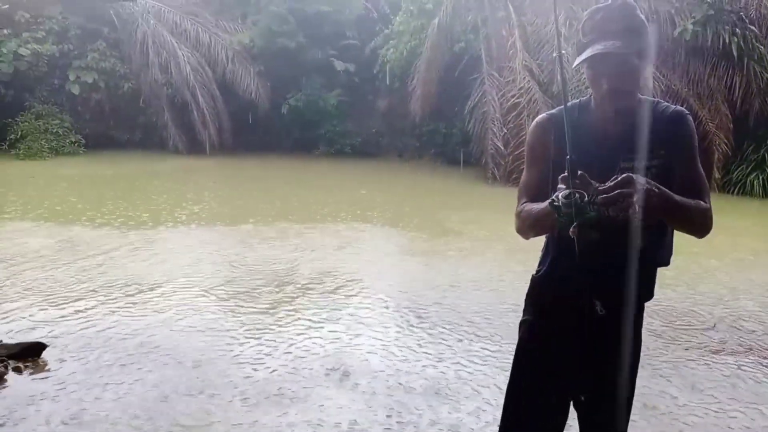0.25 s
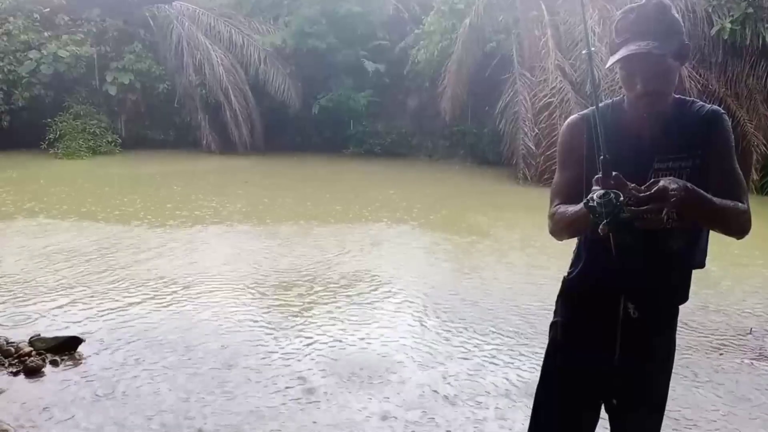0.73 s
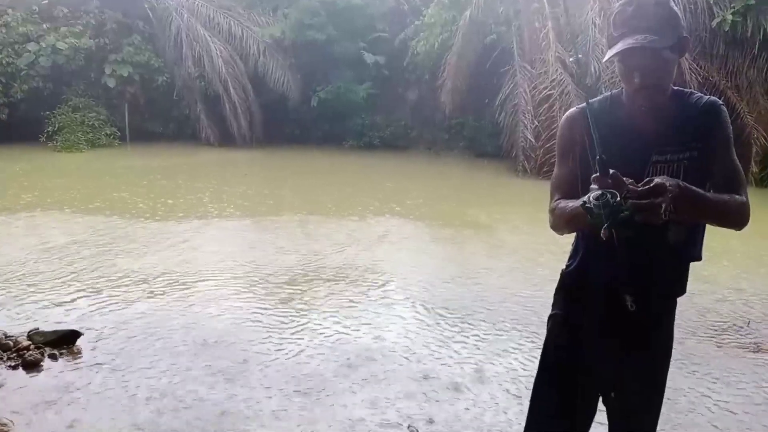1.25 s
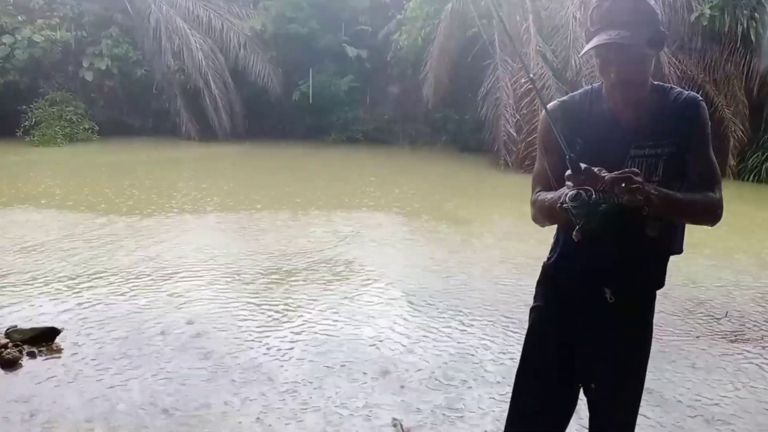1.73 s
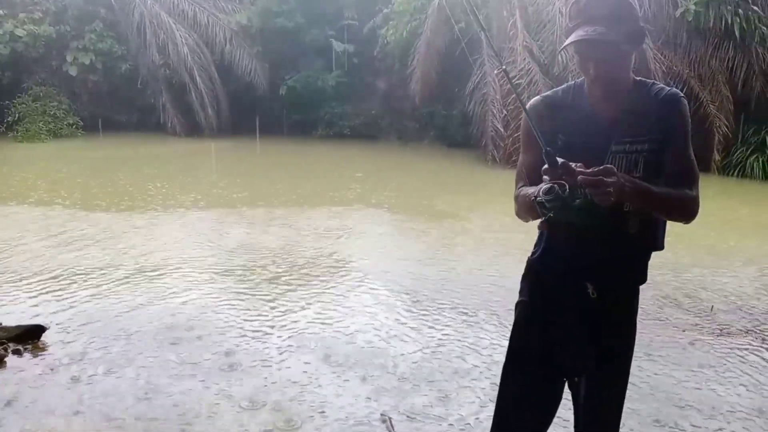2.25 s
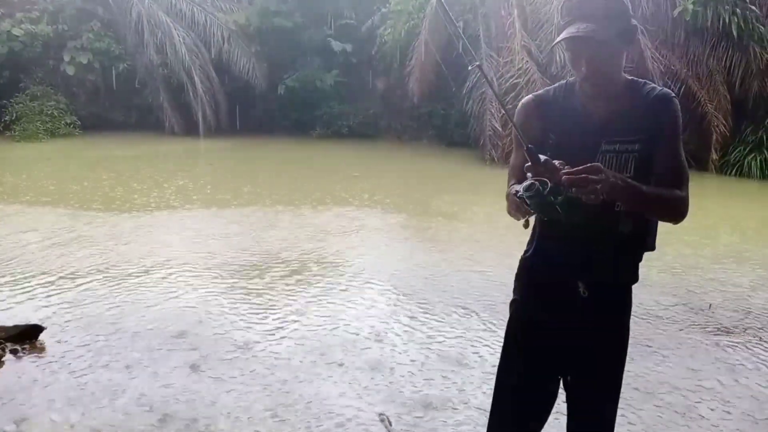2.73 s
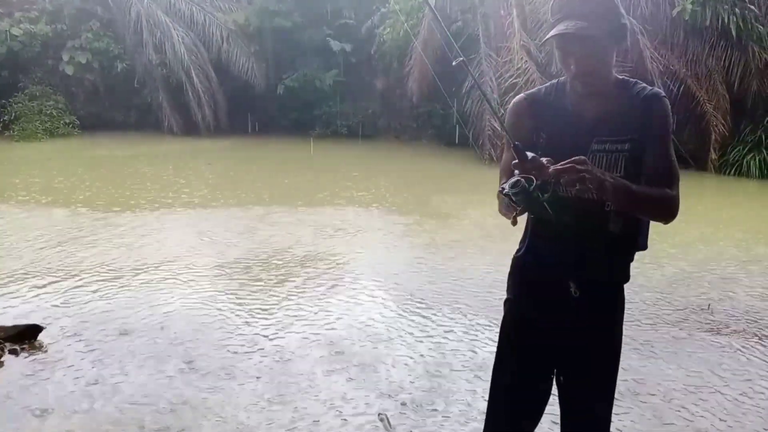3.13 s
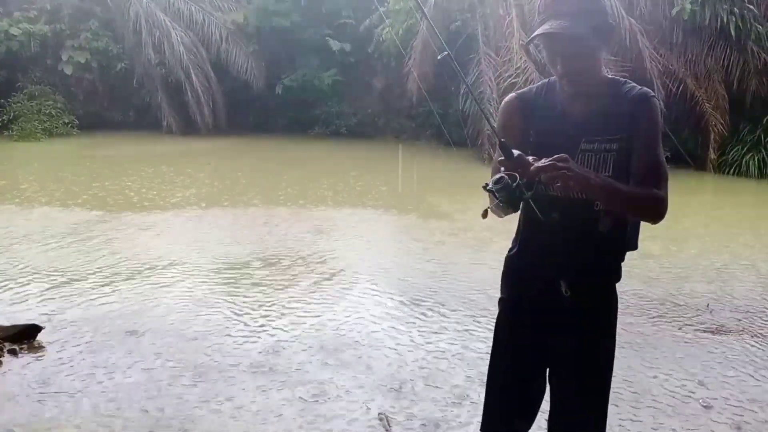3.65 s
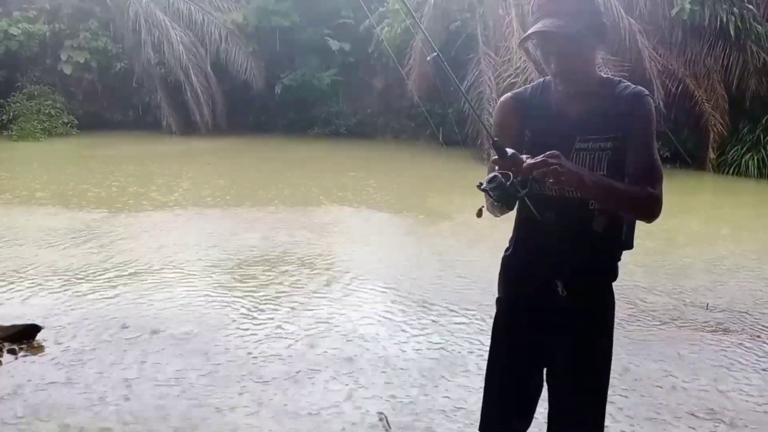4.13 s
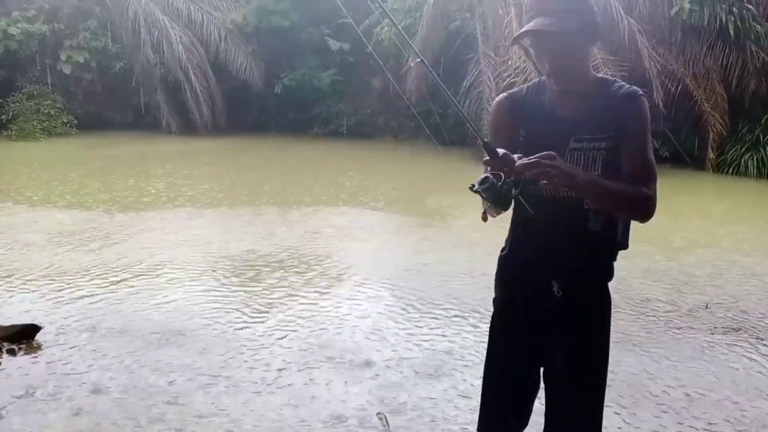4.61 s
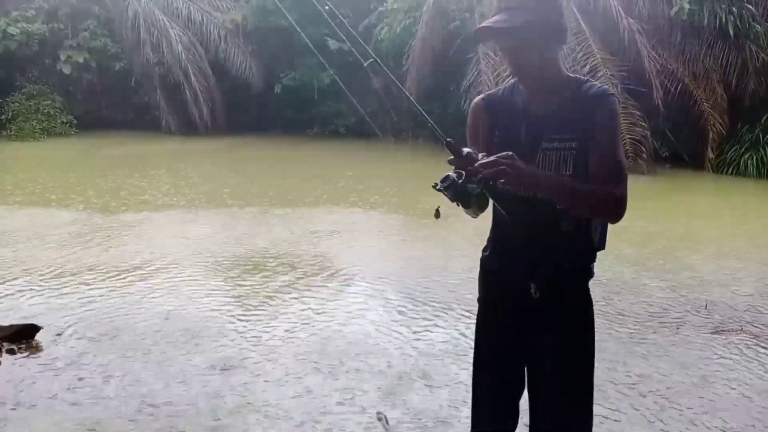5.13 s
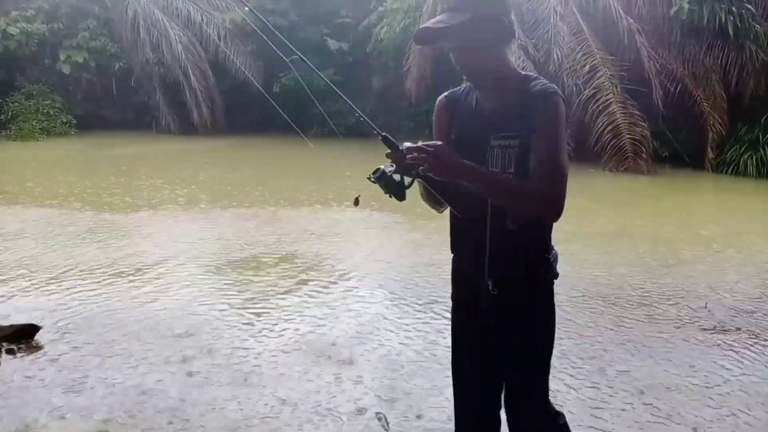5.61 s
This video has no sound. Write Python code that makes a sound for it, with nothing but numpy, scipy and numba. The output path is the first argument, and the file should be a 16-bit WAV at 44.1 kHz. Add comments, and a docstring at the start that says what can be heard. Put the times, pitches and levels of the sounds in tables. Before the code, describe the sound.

A constant rain shower on open water, neither building nor stopping. Over the dense hiss, random close drops crack, tick and plink with very short bubbly tones, sometimes in small clusters. Soft hollow drips land now and then on wet ground. Dry outdoor stereo without obvious echo, lower burbling slightly to the right, very quiet air rumble underneath.

```python
"""A steady hiss of rain on a slow river, with cracks, plinks and a few soft thuds, heard under trees on the bank.
Countless far drops merge into the hiss, made of noise in bands that flicker separately.
Nearer drops crack as noise bursts and plink as tiny bubbles, which are quickly damped sine waves.
The deeper patter lies to the right, heavy drips thud on the bank, and low noise makes the air rumble."""
import sys
import numpy as np
from scipy import signal
from scipy.fft import rfft, irfft, next_fast_len
from scipy.io import wavfile
from scipy.ndimage import uniform_filter1d
from numba import njit

SR = 44100
rng = np.random.default_rng(int(sys.argv[2]) if len(sys.argv) > 2 else 0)


def wav_out(sig):
    """Save sig, one row per channel (or a flat mono array), as 16-bit PCM at SR to the path in sys.argv[1]."""
    wavfile.write(sys.argv[1], SR, np.round(np.clip(np.atleast_2d(sig).T, -1, 1) * 32767).astype(np.int16))


N = 258867  # length of the scene [samples]


def undb(db):
    """Turn decibels into a gain."""
    return 10 ** (np.asarray(db) / 20)


def unit(x):
    """Scale a sound to an average (rms) strength of 1."""
    return x / np.sqrt(np.mean(x ** 2))


def walk(rate):
    """Wander smoothly between random levels, rate new ones per second; the rms is 1."""
    hold = max(int(SR / rate), 1)
    steps = np.repeat(rng.standard_normal(N // hold + 1), hold)
    smooth = uniform_filter1d(uniform_filter1d(steps, hold), hold)
    return unit(smooth[:N])


def band(x, low_hz, high_hz):
    """Keep one frequency band, with gentle slopes on both sides."""
    top_hz = min(high_hz, SR / 2 - 1)
    return signal.sosfilt(signal.butter(2, [low_hz, top_hz], "band", fs=SR, output="sos"), x)


def colour(x, points, power=1):
    """Filter through (frequency [Hz], gain [dB]) points without sounding before its input; power scales the dB."""
    hz, db = np.transpose(sorted(points))
    size = next_fast_len(N + SR // 10, True) * 2
    grid = np.maximum(np.fft.rfftfreq(size, 1 / SR), 1)
    gain = undb(power * np.interp(np.log(grid), np.log(hz), db))
    # folding the cepstrum gives the filter minimum phase: it responds as early as it can
    cepstrum = irfft(np.log(gain))
    cepstrum[1:size // 2] *= 2
    cepstrum[size // 2 + 1:] = 0
    return irfft(rfft(x, size) * np.exp(rfft(cepstrum)))[:N]


def shade(x, points, power=1):
    """Filter through (frequency [Hz], gain [dB]) points without shifting phase; power scales the dB."""
    hz, db = np.transpose(points)
    grid = np.maximum(np.fft.rfftfreq(N, 1 / SR), 1)
    gain = undb(power * np.interp(np.log(grid), np.log(hz), db))
    return irfft(rfft(x) * gain, N)


def add(out, s, sound):
    """Mix a short sound in at time s [s]."""
    start = int(np.clip(s * SR, 0, N - 1))
    out[start:start + len(sound)] += sound[:N - start]


def burst(low_hz, high_hz, t60):
    """A band of noise starts at once and its envelope falls by 60 dB in t60 seconds."""
    t = np.arange(SR // 4) / SR
    noise = unit(band(rng.standard_normal(len(t)), low_hz, high_hz))
    return noise * np.exp(-np.log(1000) * t / t60)


@njit
def rings(times, sizes, hz, cycles, glide):
    """Each drop starts a damped sine that swells within one cycle; its pitch creeps up as the bubble rises."""
    out = np.zeros(N)
    for k in range(len(times)):
        start = int(times[k] * SR)
        length = int(cycles[k] / hz[k] * SR) + 1  # a negative count of cycles gives no ring
        for i in range(max(0, -start), min(length, N - start)):
            age = i / length
            turns = hz[k] * i / SR
            swell = 1 - np.exp(-(2 * turns) ** 2)
            decay = np.exp(-6.9 * age)  # 60 dB down at the end
            out[start + i] += sizes[k] * swell * decay * np.sin(2 * np.pi * turns * (1 + glide * age / 2))
    return out


def far_rain(flicker_db, flicker_rate, edge_share):
    """Far drops merge into a hiss whose bands flicker separately, most deeply and slowly where the water burbles."""
    # swells of the hiss's low edge; only the changes count: (time [s], level [dB])
    low_edge = [(0.0, -52), (0.05, -61), (0.1, -54), (0.15, -60.5), (0.49, -59), (0.55, -55.5), (0.75, -68),
                (0.98, -62), (1.01, -55.5), (1.4, -61.5), (1.91, -54), (2.01, -64), (2.04, -53.5),
                (2.16, -63), (2.27, -59), (2.34, -69.5), (2.79, -57.5), (2.88, -73), (2.99, -54),
                (3.07, -66.5), (3.5, -59.5), (4.89, -60), (4.9, -65), (5.56, -57), (5.57, -62),
                (5.87, -57.5)]
    edge_db = np.interp(np.arange(N) / SR, *np.transpose(low_edge))
    size = next_fast_len(N, True)
    spectrum = rfft(rng.standard_normal(size))
    hz = np.fft.rfftfreq(size, 1 / SR)
    edges = np.r_[0, np.geomspace(400, 7500, 22), SR]
    out = np.zeros(N)
    for low, high in zip(edges[:-1], edges[1:]):
        burble = np.interp(low, [0, 450, 800, 1300, 2200], [1, 2.6, 2.4, 2, .6])  # depth
        follows = np.interp(low, [0, 400, 800, 1200], [0, 1, 1, 0])  # share of the low-edge swells
        db = burble * (walk(13) + walk(3) / 4) + flicker_db * walk(flicker_rate)
        level = unit(undb(db + edge_share * follows * edge_db))
        noise = irfft(spectrum * ((hz >= low) & (hz < high)), size)[:N]
        out += noise * level
    return unit(out)


def scatter(per_second, low_hz, high_hz, nearest_db, reach, cycles, glide):
    """Drops land evenly over a ring of water, out to reach times the nearest distance; size falls as 1 / distance."""
    when, area, pitch, damping = rng.random((int(per_second * N / SR), 4)).T
    distance = np.sqrt(1 + area * (reach ** 2 - 1))
    sizes = undb(nearest_db) / distance
    hz = low_hz + pitch * (high_hz - low_hz)
    return rings(when * N / SR, sizes, hz, cycles * (.5 + damping), float(glide))


def near_rain():
    """Low bubbles of big drops gurgle and plop, middling ones plink and tick, and the finest spray sizzles."""
    gurgles = scatter(per_second=80, low_hz=474, high_hz=1041, nearest_db=-40.5,
                      reach=6.7, cycles=74.0, glide=0.15)
    plops = scatter(per_second=350, low_hz=1013.0, high_hz=1670, nearest_db=-44.5,
                    reach=4.65, cycles=69.0, glide=0.034)
    plinks = scatter(per_second=1300, low_hz=1627, high_hz=4420, nearest_db=-38.5,
                     reach=4.1, cycles=29.7, glide=0.046)
    ticks = scatter(per_second=2400, low_hz=3530, high_hz=8400, nearest_db=-29.0,
                    reach=8.2, cycles=16.7, glide=0.046)
    spray = scatter(per_second=1200, low_hz=13400, high_hz=15200, nearest_db=-27.5,
                    reach=7.4, cycles=21.0, glide=.02)
    return gurgles + plops + plinks + ticks + spray


def splash(x, wet_db, t60):
    """Every impact trails a brief wash of droplets: noise that follows its strength and fades in t60 seconds."""
    keep = np.exp(-2 * np.log(1000) / (t60 * SR))
    power = signal.lfilter([1 - keep], [1, -keep], x ** 2)
    return x + undb(wet_db) * np.sqrt(power) * rng.standard_normal(N)


def air():
    """Faint low noise rumbles and wavers; each puff over the microphone swells and dies as one smooth arch."""
    # puffs of air: (time [s], length [s], level [dB])
    puffs = [(0.0, 0.14, -67.5), (0.913, 0.18, -70), (1.43, 0.06, -73), (1.687, 0.066, -75),
             (2.775, 0.068, -70), (3.228, 0.053, -72), (4.46, 0.095, -69.5)]
    # tone of the moving air: (frequency [Hz], gain [dB])
    air_tone = [(20, -9.5), (45, -16), (66, -3), (88, -3.5), (125, -4), (210, -16.5), (500, -58)]
    rumble_db, waver_db, waver_rate = -83, 3, 14  # level, depth [dB], new levels per second
    strength = undb(rumble_db + waver_db * walk(waver_rate))
    for s, length, db in puffs:
        arch = np.sin(np.linspace(0, np.pi, int(length * SR)))
        add(strength, s, undb(db) * arch)
    mid, side = (unit(colour(rng.standard_normal(N), air_tone)) for _ in range(2))
    return strength * (mid + undb(-14) * np.array([side, -side]))


def strays(per_second, low_hz, high_hz, loud_db, range_db, cycles):
    """Drops a few steps away land at random: rows of (time [s], level [dB], ring [Hz], cycles)."""
    when, far, pitch, damping = rng.random((int(per_second * N / SR), 4)).T
    hz = low_hz + pitch * (high_hz - low_hz)
    return np.column_stack([when * N / SR, loud_db - far * range_db, hz, cycles * (.5 + damping)])


def droplets(parents, count, below_db, range_db, within_s, cycles):
    """Each drop throws up a few ringing droplets that land just after it, the later the weaker."""
    s, db, hz, _ = np.repeat(parents, count, axis=0).T
    late, pitch = rng.random((len(s), 2)).T
    sizes = undb(db + below_db - late * range_db)
    near_hz = hz * 2 ** (pitch - .5)  # within half an octave of the parent
    return rings(s + late * within_s, sizes, near_hz, np.full(len(s), float(cycles)), 0.)


def close_drops(ring_db, slap_db, slap_t60, glide):
    """Close drops give a brief noisy slap, and most a bubble that rings and rises a little; thrown droplets fall back."""
    # close drops, most with a ringing bubble; negative cycles: slap and droplets, no ring of its own;
    # level before ring_db or slap_db is added:
    # (time [s], level [dB], ring [Hz], cycles until 60 dB down [count])
    close_hits = [(0.1763, -28, 1240, 19), (0.203, -13.5, 4670, 19), (0.638, -27, 2170, 19),
                  (0.6604, -20, 5470, 28), (0.7457, -21, 5830, 18), (0.82, -34.5, 1220, 26),
                  (0.9125, -26, 2660, 16), (1.0281, -33, 1600, 25), (1.0893, -12.5, 5600, 12),
                  (1.105, -21, 6000, 5), (1.126, -17, 5300, 13), (1.3104, -23.5, 3650, 20),
                  (1.4556, -22, 2620, 8.5), (1.456, -21, 6400, 12), (1.5229, -19.5, 6700, 11),
                  (1.5628, -22, 3930, 6), (1.6377, -25, 4050, 30), (1.69, -25, 3500, 14),
                  (1.7748, -30, 1380, 27), (1.8528, -12, 6470, 13), (1.8753, -10, 7340, 16),
                  (1.8828, -12.5, 6000, 11), (1.9216, -26, 2390, 31), (1.9262, -30, 2480, 46),
                  (1.9659, -34, 1270, 30), (1.973, -23, 5950, 36), (2.041, -15.5, 970, 3.5),
                  (2.1326, -17, 6200, 10), (2.4254, -21, 4500, 12), (2.438, -19.5, 2550, 14),
                  (2.445, -37, 1290, 28), (2.4987, -39, 1076, 162), (2.6469, -22, 4370, 14),
                  (2.7019, -13.5, 5750, 39), (2.702, -17.5, 4300, 13), (2.7021, -20.5, 2240, 11),
                  (2.9758, -19, 1280, 6.5), (2.976, -24, 2600, 4), (2.99, -21, 6200, 16),
                  (3.0508, -9.5, 6640, 8), (3.1157, -15.5, 3100, 9), (3.1423, -27, 6500, 3),
                  (3.247, -35, 1254, 81), (3.368, -22, 5970, 24), (3.4238, -9.5, 6860, 10.5),
                  (3.4989, -16, 4500, 6), (3.5187, -27.5, 2490, 53), (3.567, -28, 2540, 20),
                  (3.6067, -32.5, 1470, 41), (3.7516, -29.5, 1330, 19), (4.044, -34, 1260, 21),
                  (4.0971, -12.5, 4030, 22), (4.1042, -10, 5600, 8), (4.3799, -31, 1140, 13),
                  (4.5045, -19, 5400, 19), (4.573, -19.5, 6100, 17), (4.6743, -25.5, 3890, 29),
                  (4.7222, -20, 5600, 22), (5.0205, -25, 8300, 13), (5.0899, -18.5, 6600, 18),
                  (5.1188, -29.5, 1310, 25), (5.2225, -20, 3650, 11), (5.6126, -46, 4080, -6),
                  (5.6221, -16, 7160, 16), (5.6472, -18, 4550, 14), (5.6473, -27, 2040, 34),
                  (5.681, -38, 1280, 62)]
    small = strays(per_second=80, low_hz=1800, high_hz=7500, loud_db=-23.5, range_db=6, cycles=7)
    s, db, hz, cycles = np.vstack([close_hits, small]).T.copy()
    out = rings(s, undb(db + ring_db), hz, cycles, float(glide))
    for when, size_db, ring_hz in zip(s, db, hz):
        slap = burst(ring_hz / 1.4, ring_hz * 1.4, slap_t60)
        add(out, when, undb(size_db + slap_db) * slap)
    return out + droplets(close_hits, count=3, below_db=-12, range_db=7, within_s=.022, cycles=9)


def cracks(crack_db, t60, per_second, faint_db, range_db):
    """Drops burst on something hard: a bright noise click with no ring. Fainter ones fall at random."""
    # sharp close impacts, level before crack_db is added: (time [s], level [dB])
    sharp = [(0.0827, -27.5), (0.621, -30), (0.838, -34), (1.1697, -26), (1.3104, -32), (1.401, -28.5),
             (1.477, -41), (1.787, -28.5), (1.8825, -18), (1.9684, -30), (1.9865, -31), (2.0363, -35),
             (2.702, -34), (2.7467, -29.5), (3.1423, -32), (3.2146, -31), (3.2884, -30), (3.4238, -32),
             (4.0767, -25), (4.7559, -28), (4.9182, -31), (5.0205, -20.5), (5.4879, -36), (5.5378, -39),
             (5.7304, -29), (5.8531, -26)]
    when, far = rng.random((int(per_second * N / SR), 2)).T
    faint = np.column_stack([when * N / SR, faint_db - far * range_db])
    out = np.zeros(N)
    for s, db in np.vstack([sharp, faint]):
        add(out, s, undb(db + crack_db) * burst(9000, 16500, t60))
    return out


def thuds(glide, smack_db, smack_t60):
    """Heavy drips hit puddles: a bright smack, a hollow plop that rises in pitch, a ragged tail of falling water."""
    # heavy drips on the bank: (time [s], level [dB], ring [Hz], cycles until 60 dB down [count])
    heavy = [(0.0928, -44, 554, 28), (1.053, -40, 368, 28), (1.75, -46, 280, 15), (3.547, -54, 320, 27),
             (3.935, -47, 522, 44), (5.282, -48, 440, 14)]
    s, db, hz, cycles = np.array(heavy, float).T.copy()
    out = rings(s, undb(db), hz, cycles, float(glide))
    for when, size_db, ring_hz in zip(s, db, hz):
        smack = burst(ring_hz * 1.26, ring_hz * 3.8, smack_t60)
        add(out, when, undb(size_db + smack_db) * smack)
    return out + droplets(heavy, count=18, below_db=-6, range_db=10, within_s=.065, cycles=6)


def scene():
    """Far hiss and near drops share one colour, and one direction with the heavy drips; the air lies beneath."""
    # tone of the rain: (frequency [Hz], gain [dB])
    rain_tone = [(59, -71), (100, -20), (247, -19.5), (385, -16.5), (437, -17.5), (710, -7.5), (1250, -0.5),
                 (1870, -2.5), (4170, -0.5), (4930, -3), (6630, 0.5), (7680, -8.5), (9290, -21.5),
                 (11200, -12.5), (12500, -2), (14200, 2), (15400, 2.5)]
    # where the rain lies: (frequency [Hz], left minus right [dB])
    balance = [(380, -.3), (520, -6.5), (700, -10), (950, -9), (1150, -4.5), (1500, -1.6), (2300, 0)]
    # level of separate noise that differs between the ears: (frequency [Hz], gain [dB])
    diffuse = [(350, -13.5), (650, -11), (1100, -8.5), (1800, -17), (3000, -25), (4200, -39), (7500, -33),
               (9200, -10), (11000, -10), (12500, -28), (15000, -36)]
    hiss_db, fine_db = -37.5, -50  # hiss and its fine spray, before the rain's tone is applied
    swell_db, swell_rate = .35, 2  # the shower's swells: depth [dB], new levels per second
    flurry_db, flurry_rate = 1.1, 16  # little flurries of near drops, likewise

    hiss = far_rain(flicker_db=1.93, flicker_rate=35, edge_share=1.0)
    fine = signal.sosfiltfilt(signal.butter(4, 9500, "high", fs=SR, output="sos"), hiss)
    far = (hiss - fine) * undb(hiss_db) + fine * undb(fine_db)
    far = far * undb(swell_db * walk(swell_rate))
    flurry = undb(flurry_db * walk(flurry_rate))
    close = close_drops(ring_db=1, slap_db=-14, slap_t60=.003, glide=.06)
    clicks = cracks(crack_db=5.5, t60=0.0028, per_second=9, faint_db=-32.5, range_db=5)
    patter = far + splash(near_rain() * flurry, wet_db=-6, t60=0.013)
    patter = patter + splash(close + clicks, wet_db=-14, t60=0.02)
    drips = thuds(glide=.3, smack_db=-1, smack_t60=.08)
    rain = colour(patter, rain_tone) + drips
    # a little separate noise differs between the ears
    noise = colour(rng.standard_normal(N) * np.std(patter), rain_tone)
    side = shade(noise, diffuse)
    # each ear takes half of the left-right difference
    left = shade(rain, balance, 1 / 2) + side
    right = shade(rain, balance, -1 / 2) - side
    return np.array([left, right]) + air()


def record(dry):
    """The phone cuts the top steeply, above 15550 Hz."""
    return signal.sosfilt(signal.ellip(12, .1, 70, 15550, fs=SR, output="sos"), dry)


dry = scene()
out = record(dry)
wav_out(out)
```